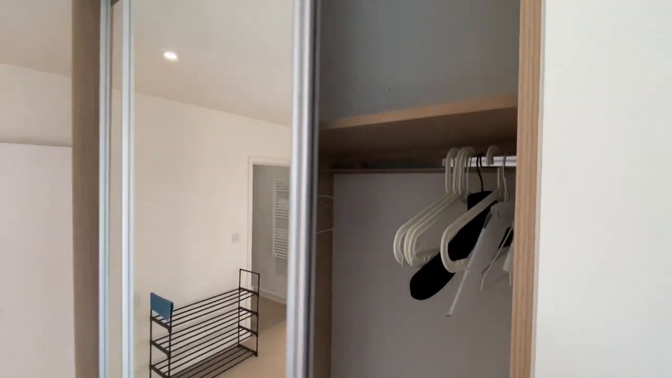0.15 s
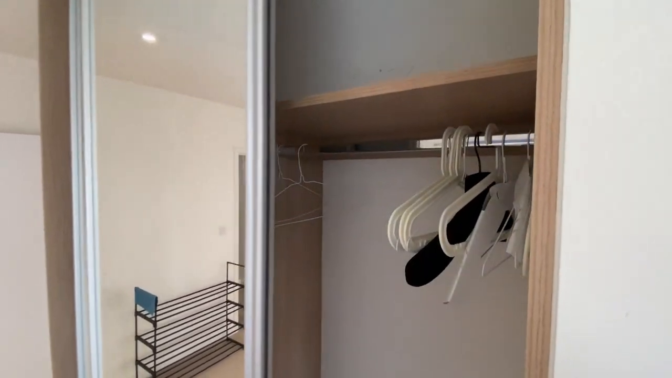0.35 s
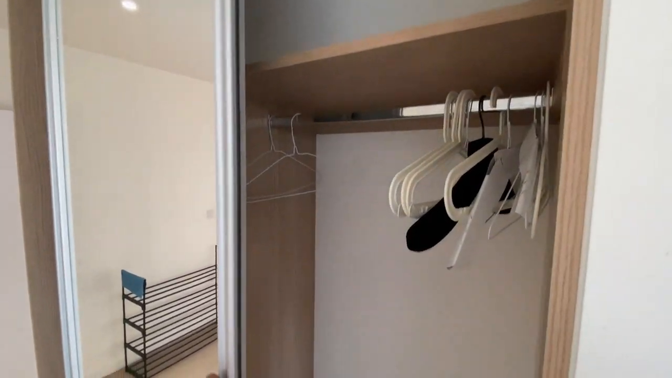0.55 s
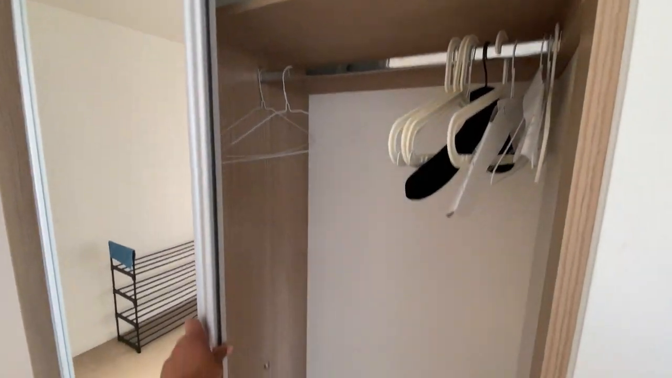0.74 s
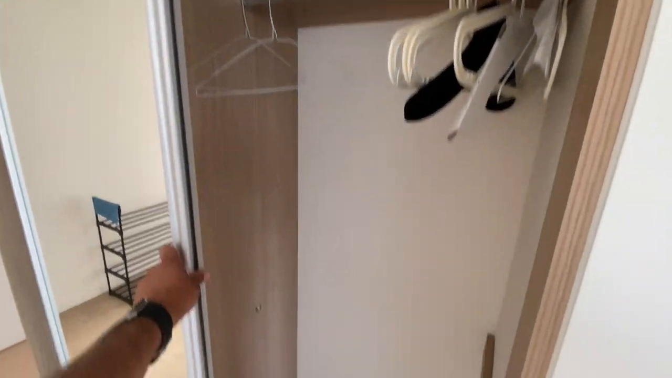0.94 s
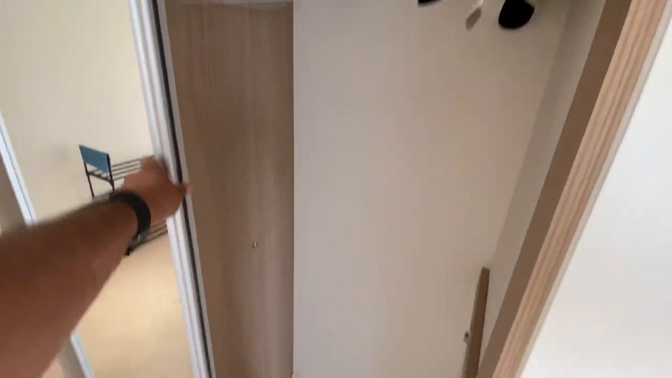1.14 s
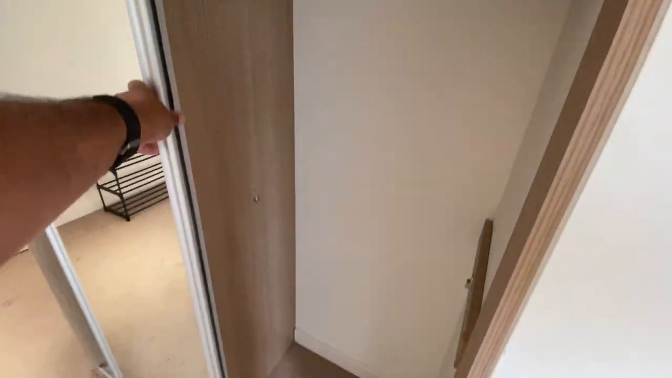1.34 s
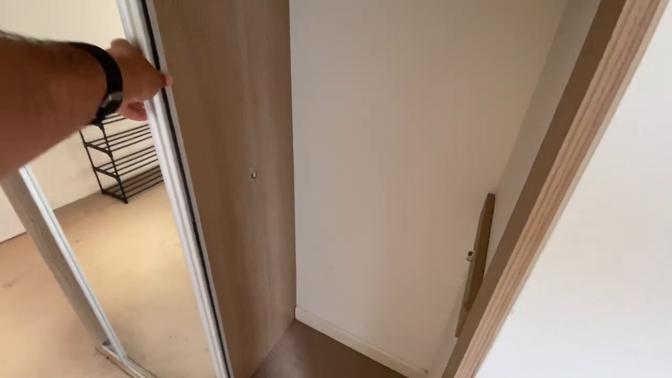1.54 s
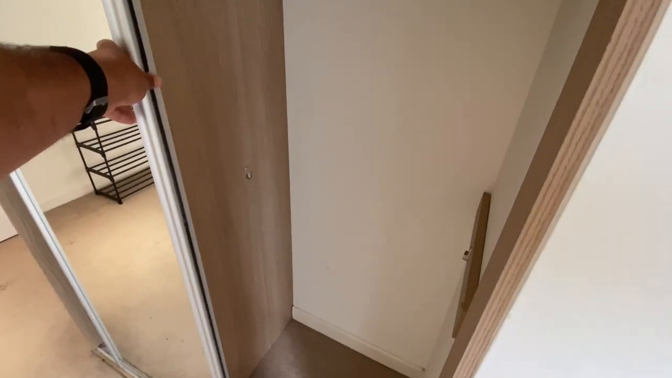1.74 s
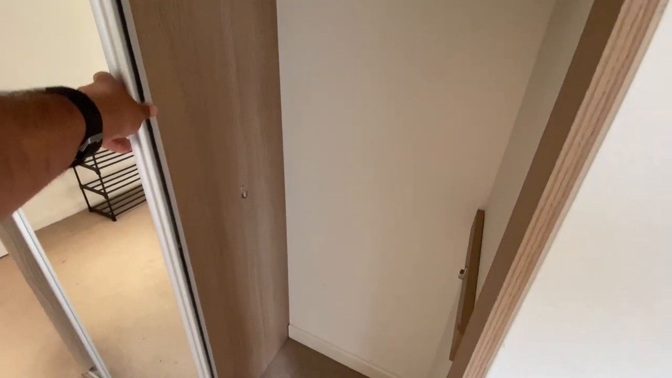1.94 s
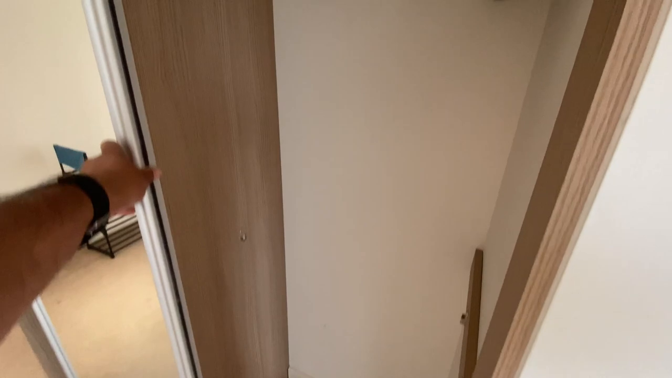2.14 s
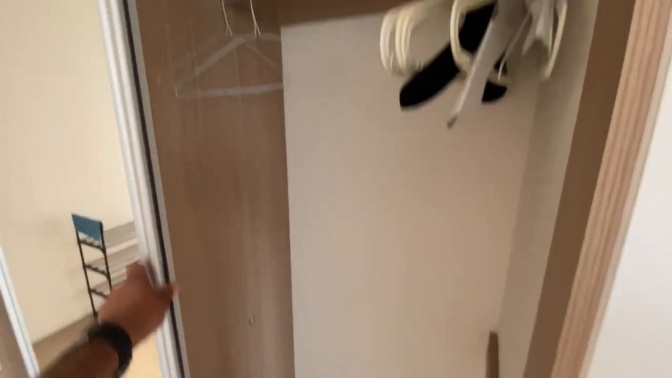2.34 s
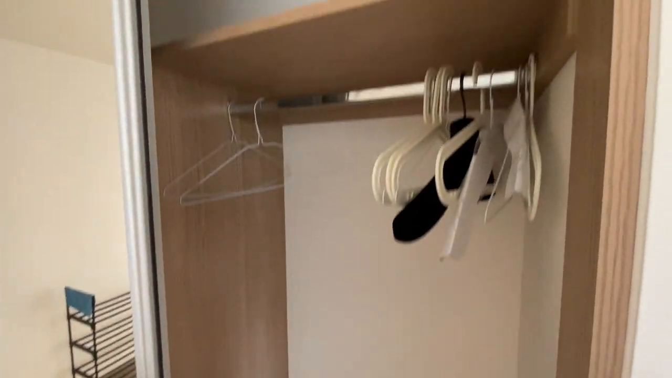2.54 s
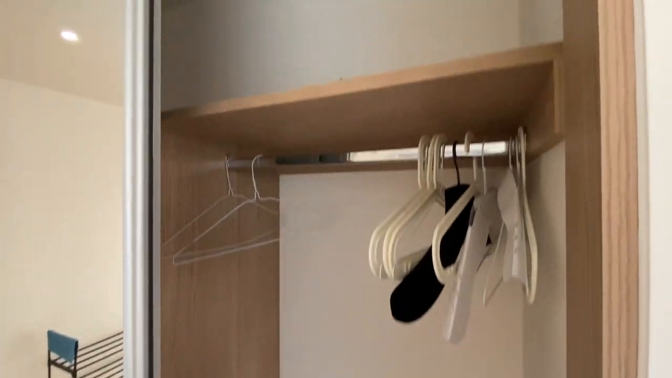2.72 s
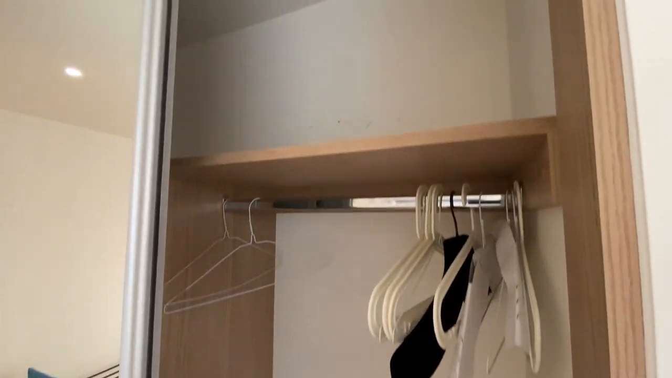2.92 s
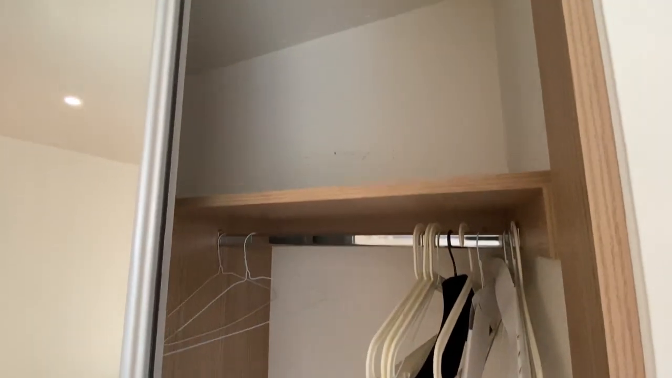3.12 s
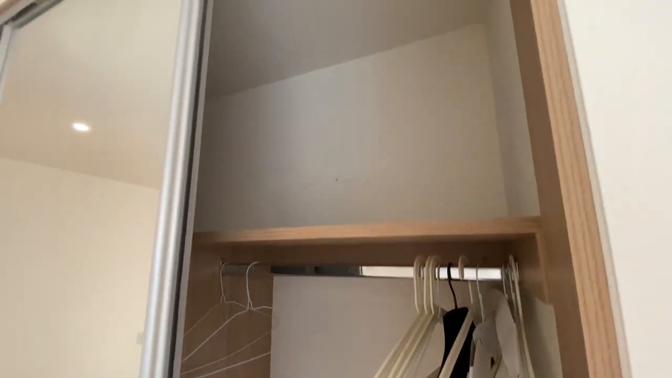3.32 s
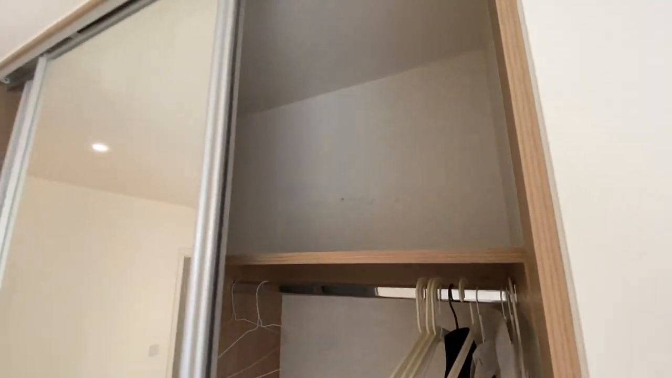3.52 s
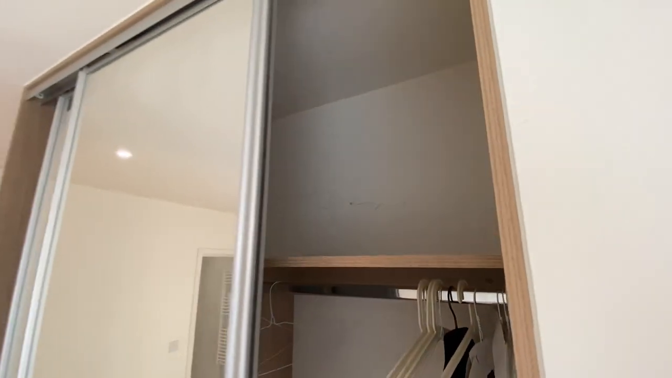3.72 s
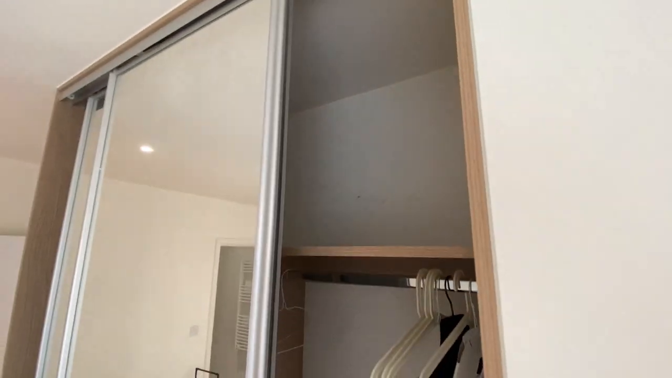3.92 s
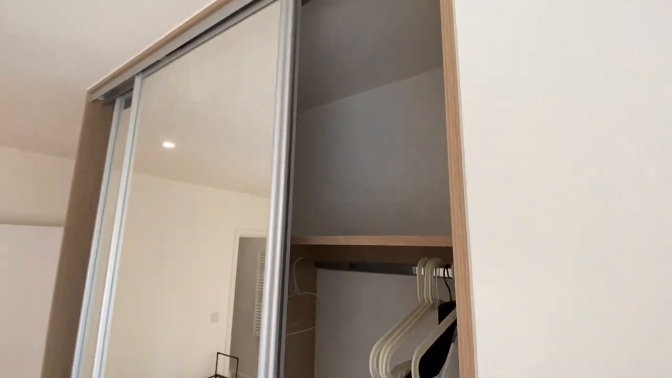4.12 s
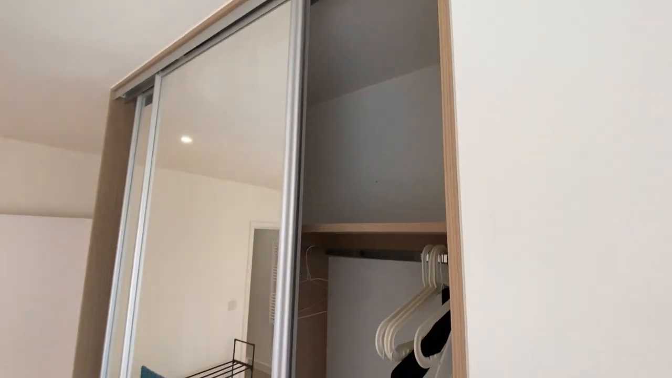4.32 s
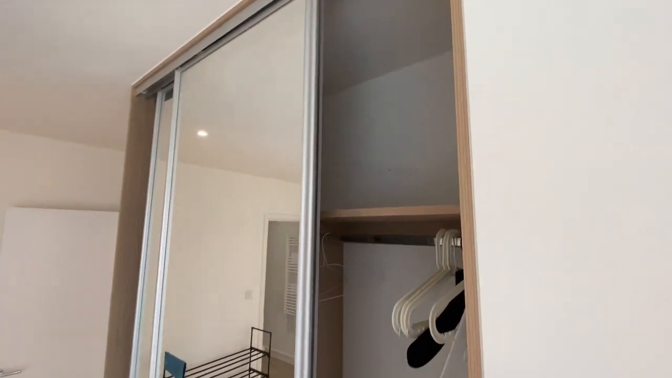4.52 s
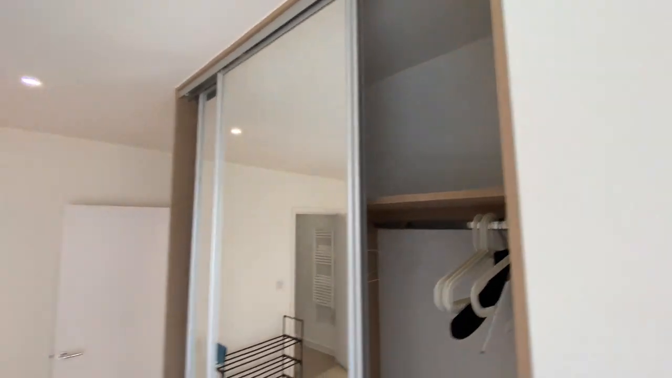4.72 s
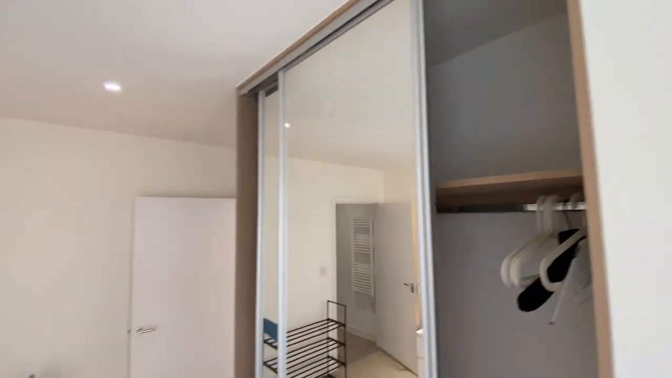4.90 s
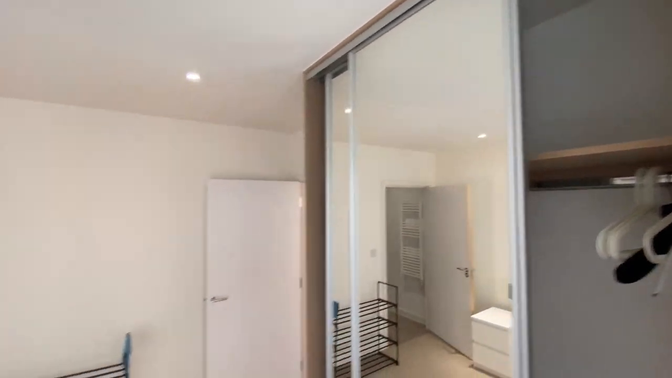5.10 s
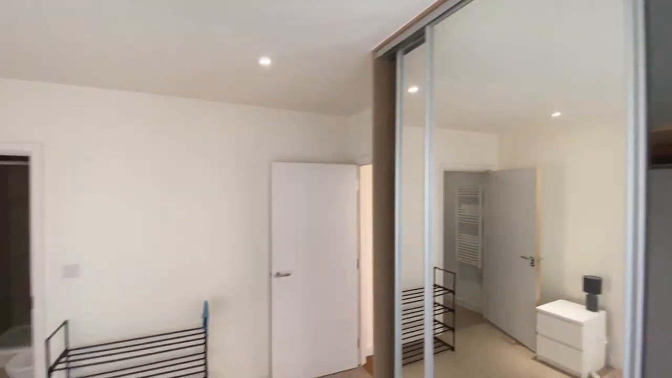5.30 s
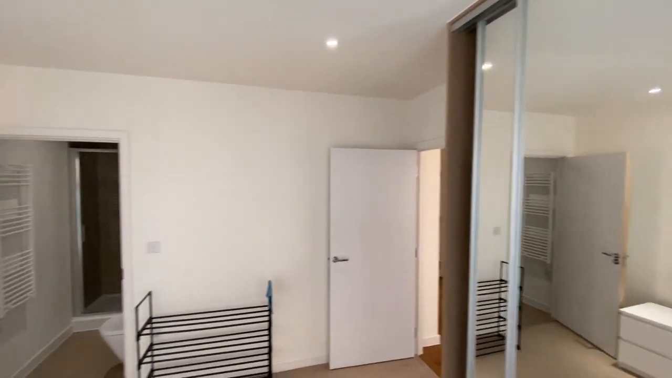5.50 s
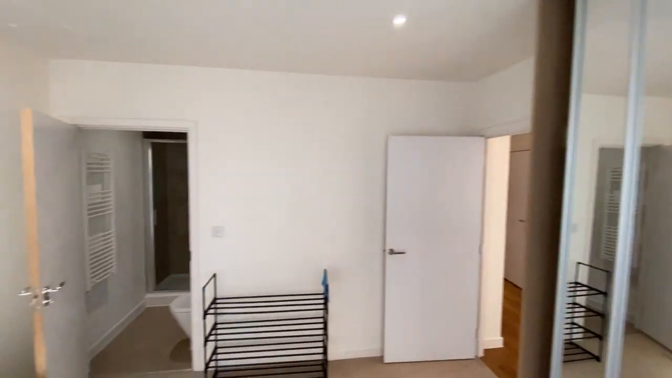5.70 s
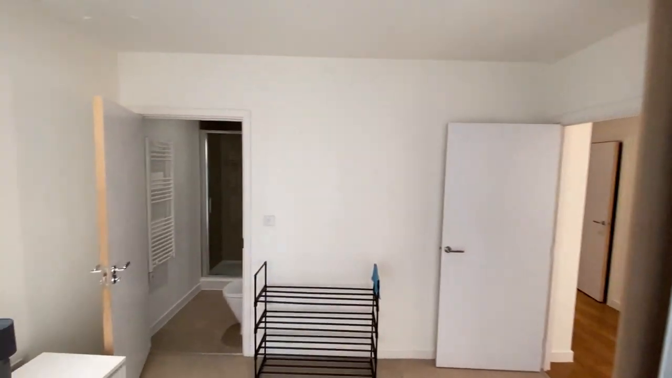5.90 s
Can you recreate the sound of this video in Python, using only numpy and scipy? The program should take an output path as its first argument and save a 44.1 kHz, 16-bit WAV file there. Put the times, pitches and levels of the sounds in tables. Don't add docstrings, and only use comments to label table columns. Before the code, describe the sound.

Close up in a quiet bedroom, a metal-framed wardrobe door is already rolling, with a low panel boom, woody drone, gritty hiss and dense bright clicks. It slows and nearly stops after about a second. Following a hush with faint creaks and ticks, it shifts again in a short rattling burst with knocks and a scrape, then a sharp clack. Soft foot scuffs and dull floor thuds finish, heard in stereo at arm's length.

```python
import sys
import numpy as np
from scipy import signal
from scipy.fft import rfft, irfft, next_fast_len
from scipy.io import wavfile
from scipy.ndimage import uniform_filter1d

SR = 44100
rng = np.random.default_rng(int(sys.argv[2]) if len(sys.argv) > 2 else 0)


def magnitude_from_level(level_db):
    exponent = np.asarray(level_db, float) / 20
    return 10 ** exponent


def wav_out(sig):
    wavfile.write(sys.argv[1], SR, np.round(np.clip(np.atleast_2d(sig).T, -1, 1) * 32767).astype(np.int16))


N = 266883

# frequency in Hz, width in Hz, level in dB.
CARCASS_MODES = [(227, 49, -0.5), (299, 21, -1.5), (413, 8.7, 10), (894, 75, -4), (1020, 11, -5.5),
                 (1590, 79, 0.5), (1993, 21, 8)]
# frequency in Hz, level in dB per Hz.
WOOD_SPECTRUM = [(180, -14.5), (300, -8), (635, -6.5), (928, -2.5), (1160, -3), (2150, -11.5), (2600, -13),
                 (3380, -83), (5720, -120)]


def evened(x):
    return x / np.sqrt(np.mean(x ** 2) + 1e-20)


def noise():
    return rng.standard_normal((2, N))


def columns(rows, x, warp=np.asarray):
    first, *rest = np.transpose(rows)
    return [np.interp(warp(x), warp(first), c) for c in rest]


def shaped(x, spectrum=None, modes=(), modes_db=0.):
    size = next_fast_len(N)
    hz = np.fft.rfftfreq(size, 1 / SR) + 1
    ring = sum(magnitude_from_level(db) / (1 + 2j * (hz - f) / width) for f, width, db in modes)
    if spectrum is None:
        low_cut = hz ** 4 / (hz ** 4 + 36.0 ** 4)
        gain = ring * low_cut
    else:
        inside = (hz > spectrum[0][0]) & (hz < spectrum[-1][0])
        smooth = magnitude_from_level(columns(spectrum, hz, np.log)[0]) * inside
        gain = smooth * (1 + magnitude_from_level(modes_db) * ring)
    return evened(irfft(rfft(x, size) * gain, size)[:, :N])


def lumpy(length):
    return evened(uniform_filter1d(uniform_filter1d(rng.standard_normal(N), length), length))


def grit(per_s, spread_db, lump_s, lump_db):
    lumps = lumpy(int(lump_s * SR))
    size = magnitude_from_level(spread_db * np.minimum(rng.exponential(1, N), 4) + lump_db * lumps)
    return size * (rng.random(N) < per_s / SR) * noise()


def during(rows, fade_s=0.028):
    t = np.arange(N) / SR
    start_s, end_s = rows[0][0], rows[-1][0]
    fade_in = np.clip((t - start_s) / fade_s + .5 + 9 * (start_s < .01), 0, 1)
    fade_out = np.clip((end_s - t) / fade_s + .5 + 9 * (end_s > 6), 0, 1)
    return fade_in * fade_out


def add(mix, s, sound):
    part = mix[..., round(s * SR):][..., :sound.shape[-1]]
    part += sound[..., :part.shape[-1]]


def strokes(rows, fall_db_per_s, sag_db_per_s=0):
    start, rise, hold, db = np.transpose(rows)[:, :, None]
    at = np.arange(0, N + 64, 64)
    t = at / SR - start
    swell = np.sin(np.pi / 2 * np.clip(t / rise, 0, 1)) ** 2
    fall_db = fall_db_per_s * np.maximum(t - rise - hold, 0) + sag_db_per_s * np.maximum(t, 0)
    gain = swell * magnitude_from_level(db - fall_db)
    return np.interp(np.arange(N), at, np.sqrt((gain ** 2).sum(0)))


def steady(x, evenness):
    swing = abs(signal.hilbert(x, next_fast_len(N))[:, :N])
    return evened(x / (swing + 0.071) ** np.clip(evenness, 0, 1))


def room_air():
    # frequency in Hz, level in dB per Hz.
    air_spectrum = [(15, -34), (25, -21), (81, 1), (145, -7.5), (289, -4.5), (546, -23.5), (761, -20.5),
                    (933, -22), (1060, -26.5), (1300, -25), (1950, -25.5), (2580, -37.5), (6810, -33.5),
                    (9240, -41), (11000, -46.5), (14400, -76), (22000, -120)]
    return magnitude_from_level(-69) * shaped(noise(), air_spectrum)


def panel(roll):
    # frequency in Hz, width in Hz, level in dB.
    boom_modes = [(60.8, 4.8, 11.5), (66, 4.1, -10.5)]
    # frequency in Hz, width in Hz, level in dB.
    flex_modes = [(99.4, 7, 4), (123.9, 6.2, 4.5), (177, 60, -26)]
    # start in seconds, hold in seconds, level in dB.
    sway_rows = [(-.05, 0.27, -45.5), (.29, 0.043, -41.5), (.46, 0.085, -39.5), (.62, 0.12, -44.5),
                 (.81, 0.005, -44.5), (.94, 0.14, -53.5), (1.69, 0.33, -63.5), (2.47, 0.14, -63.5),
                 (2.7, .015, -73), (3.29, 0.026, -56.5), (3.48, 0.24, -64.5), (3.84, 0.02, -51),
                 (4.3, 0.069, -63.5)]
    # start in seconds, hold in seconds, level in dB.
    flex_rows = [(-.05, 0.062, -45), (0.169, 0.016, -42.5), (0.374, 0.2, -42.5), (0.61, 0.18, -47),
                 (0.831, 0.023, -49), (0.918, 0.17, -47.5), (1.372, 0.18, -71.5), (2.225, 0.033, -68),
                 (2.422, 0.13, -66), (2.697, 0.01, -70), (2.802, 0.017, -65.5), (3.652, 0.15, -52),
                 (3.748, 0.12, -45.5), (4.18, 0.24, -64.5)]
    rise_s, fall_db_per_s = 0.035, 265
    sway = strokes([(s, rise_s, hold, db) for s, hold, db in sway_rows], fall_db_per_s)
    flex = strokes([(s, rise_s, hold, db) for s, hold, db in flex_rows], fall_db_per_s)
    boom = np.hypot(sway, roll) * steady(shaped(noise(), modes=boom_modes), 0.74)
    return boom + np.hypot(flex, magnitude_from_level(1.5) * roll) * steady(shaped(noise(), modes=flex_modes), 0.53)


def track(roll):
    # frequency in Hz, width in Hz, level in dB.
    rail_modes = [(3150, 17, -1), (3774, 40, -2.5), (4170, 93, -2), (4690, 90, -2.5), (5490, 14, 5.5),
                  (5840, 33, 5.5), (6240, 31, 9.5), (6700, 13, -2), (6794, 9.7, 13), (6770, 9.7, -3),
                  (8780, 46, 10.5), (9240, 45, -1)]
    # frequency in Hz, level in dB per Hz.
    hiss_spectrum = [(1180, 4.5), (2000, 2), (2510, 4.5), (3400, 7.5), (4180, 2), (5560, -8.5), (6800, -23),
                     (7600, -64)]
    # frequency in Hz, level in dB per Hz.
    fizz_spectrum = [(4500, -5), (5600, -2.5), (6700, -5.5), (7400, -9), (8730, -8), (10100, -9),
                     (11200, -17), (12200, -29), (12900, -27), (13400, -25), (14800, -23), (15500, -28)]
    # start, rise and hold in seconds, hiss level in dB, fizz re hiss in dB.
    scrape_rows = [(-.03, .02, 0.066, -44.5, 2), (0.14, 0.046, 0.077, -50.5, -1),
                   (.22, 0.053, 0.083, -49.5, -1.5), (.674, 0.0048, .05, -73, -8),
                   (1.26, .006, .015, -67.5, -20), (2.434, 0.066, 0.081, -75.5, -25),
                   (2.592, .1, .06, -77.5, -3.5), (3.26, 0.11, 0.11, -73.5, -6),
                   (3.553, 0.081, 0.16, -65.5, -0.5), (3.751, 0.1, 0.052, -52.5, 2.5),
                   (4.112, 0.006, 0.13, -60, -2), (4.2925, 0.004, 0.067, -58.5, -8),
                   (2.963, .004, .02, -69, -14)]
    hiss = strokes([row[:-1] for row in scrape_rows], 194)
    fizz_rows = [(s, rise, hold, db + re_db) for s, rise, hold, db, re_db in scrape_rows]
    fizz = strokes(fizz_rows, fall_db_per_s=215, sag_db_per_s=14)
    wear = magnitude_from_level(-60) * (roll / magnitude_from_level(-60)) ** 1.22
    specks = grit(15000, .6, .008, 1.1)
    out = np.hypot(hiss, magnitude_from_level(-4.5) * wear) * shaped(specks, hiss_spectrum, rail_modes, modes_db=5.0)
    out += fizz * shaped(specks, fizz_spectrum, rail_modes, modes_db=-8.0)
    dull = [row for row in fizz_spectrum if row[0] < 12500]
    return out + magnitude_from_level(-15) * wear * shaped(specks[:, ::-1], dull, rail_modes, modes_db=0.0)


def rolling():
    # time in seconds, carcass drone level in dB.
    roll_rows = [(0.0, -57), (0.11, -55.5), (0.27, -51), (0.66, -58), (0.84, -60), (0.91, -64), (0.98, -60),
                 (1.16, -61), (1.25, -68.5), (1.56, -78), (2.1, -92), (2.45, -76), (2.97, -66), (3.28, -71),
                 (3.47, -67.5), (3.9, -57.5), (4.05, -65.5), (4.62, -72.5)]
    # frequency in Hz, level in dB per Hz.
    drone_spectrum = [(100, -53), (170, 9.5), (424, -5), (532, -3.5), (1010, -0.5), (1360, -9), (1560, -7),
                      (2600, -6.5), (3380, -25), (5720, -120)]
    roll = magnitude_from_level(columns(roll_rows, np.arange(N) / SR)[0])
    drone = roll * shaped(grit(5000, 1.5, .02, 1.8), drone_spectrum, CARCASS_MODES, modes_db=-2.5)
    return (panel(roll) + drone + track(roll)) * during(roll_rows)


def frame_rings():
    # start in seconds, length in seconds, frequency in Hz, width in Hz, level in dB.
    ring_rows = [(0, .08, 3250, 1100, -51), (0, .03, 5500, 200, -57), (.03, .018, 3200, 120, -51),
                 (.03, .04, 5490, 60, -52), (0, .08, 8800, 2500, -58), (.25, .11, 5500, 90, -61),
                 (.32, .02, 4900, 300, -57), (.522, .025, 13800, 2200, -75), (2.52, .44, 13100, 1000, -99),
                 (2.81, .04, 1950, 150, -71), (2.9, .05, 2000, 120, -74), (2.92, .1, 5550, 80, -82),
                 (3.05, .45, 13100, 1000, -99), (3.12, .22, 5500, 1800, -80), (3.27, .06, 5380, 200, -82),
                 (3.37, .05, 1000, 300, -70), (3.39, .04, 2000, 500, -72), (3.43, .11, 4150, 90, -78),
                 (3.44, .07, 1700, 40, -71), (3.595, .03, 4000, 2500, -66), (4.112, .012, 13500, 1800, -66),
                 (4.148, .03, 4700, 250, -61), (4.148, .05, 2800, 700, -61), (4.2, .02, 3300, 500, -64),
                 (4.292, .006, 4200, 1500, -55), (4.296, .01, 2700, 1200, -57), (4.31, .11, 2000, 900, -63),
                 (4.32, .014, 3500, 900, -60), (4.49, .14, 900, 120, -76), (4.735, .07, 950, 200, -64),
                 (4.76, .08, 2050, 300, -68), (5.1, .13, 1650, 150, -78), (5.1, .1, 1100, 200, -78),
                 (5.398, .05, 900, 400, -75), (5.81, .015, 900, 600, -73), (5.88, .04, 1050, 250, -72)]
    out = np.zeros((2, N))
    for s, length_s, hz, width_hz, db in ring_rows:
        t = np.arange(0, length_s + .004, 1 / SR)
        rub = rng.standard_normal((2, len(t) + 1000))
        rub = signal.lfilter(*signal.butter(2, width_hz / SR), rub)[:, 1000:]
        swell = np.sin(np.pi * (t / t[-1]) ** 0.7)
        add(out, s, magnitude_from_level(db) * swell * evened(rub * np.sin(2 * np.pi * hz * t)))
    return out


def rail_ping(t, hz, snap):
    overtone, detune, phase = rng.random(3)
    lag_cycles = np.array([[0], [.25]])
    ping = np.sin(2 * np.pi * (hz * t - lag_cycles)) * ((t / .00055) * np.exp(1 - t / .00055)) ** 2
    overtone_hz = (1.25 + .3 * overtone) * hz
    ping = ping + .1 * np.sin(2 * np.pi * overtone_hz * t) * (t / .0007) * np.exp(1 - t / .0007)
    tail = np.sin(2 * np.pi * ((.9 + .17 * detune) * hz * t + phase - lag_cycles))
    ping = ping + 0.7 * tail * (1 - np.exp(-t / 0.002)) * np.exp(-t / 0.0036)
    return ping + magnitude_from_level(-17) * snap * (t / .0006) * np.exp(1 - t / .0006)


def carcass_knock(t, wood):
    # frequency in Hz, level in dB, 60 dB decay in seconds.
    knock_modes = [(881, -3.5, 0.059), (1056, -5.5, 0.14), (1420, -39, 0.018), (1776, 8, 0.032),
                   (2175, 2.5, 0.046), (434.5, -7.5, 0.064)]
    knock = 0.66 * wood * magnitude_from_level(-60 * t / 0.16)
    for hz, db, t60_s in knock_modes:
        phase, detune = rng.random((2, 1)), rng.random()
        tone = np.sin(2 * np.pi * (hz * (.95 + 0.082 * detune) * t + phase))
        knock = knock + magnitude_from_level(db - 60 * t / t60_s - 37.0 * phase[0, 0]) * tone
    swell = 1 - np.exp(-(t / 0.0047) ** 2)
    return 0.71 * swell * knock


def clicks():
    # time in seconds, peak in dB, ping in Hz.
    joint_rows = [(0.146, -30, 4270), (0.4185, -37, 3830), (0.5225, -30.5, 3800), (0.6039, -37.5, 3960),
                  (0.6777, -33.5, 3870), (0.7305, -40, 3890), (0.7567, -41, 3930), (0.8302, -39.5, 3570),
                  (0.9032, -33.5, 3720), (1.001, -34, 3430), (1.094, -39, 3500), (1.2592, -49, 3530),
                  (1.277, -51, 3150), (2.2476, -63, 3400), (2.4722, -57.5, 2820), (2.815, -48, 3620),
                  (2.962, -47, 3600), (3.0272, -50.5, 3600), (3.0952, -49, 3640), (3.1344, -55.5, 3550),
                  (4.543, -66, 4200), (4.571, -64, 3440), (5.0663, -63, 3120), (5.4013, -75, 3320)]
    # time in seconds, peak in dB, ping in Hz.
    rattle_rows = [(0.1979, -35.5, 3800), (0.208, -34.5, 3250), (0.234, -32.5, 4350), (0.2478, -45, 3280),
                   (0.266, -54, 3830), (0.329, -55, 4800), (0.383, -39, 4170), (0.4281, -34.5, 4010),
                   (0.4622, -33.5, 3900), (0.476, -37.5, 3840), (0.5077, -45, 3800), (0.535, -38, 3530),
                   (0.688, -38.5, 3670), (0.784, -52, 3780), (0.562, -42, 3840), (0.582, -45, 4100),
                   (0.6372, -42, 3870), (0.846, -51, 3940), (0.963, -44.5, 3410), (1.022, -43, 3620),
                   (1.0597, -43, 3600), (2.761, -65, 3180), (2.9284, -54, 3730), (0.2866, -39, 4340)]
    # time in seconds, peak in dB, ping in Hz, knock and crack re ping in dB.
    bump_rows = [(0.182, -31, 4130, -6.5, -5), (3.6115, -54, 3500, -7, 0), (3.6545, -35, 4180, -2, -1.5),
                 (3.7607, -41.5, 3990, -3, -1.5), (3.7698, -37, 3840, -1, -2), (3.817, -39, 3900, -0.5, -3),
                 (4.072, -55, 3830, -3.5, -4), (4.1125, -35, 4200, -16, 1),
                 (4.1182, -30.5, 4380, -12.5, -2.5), (4.2938, -43, 3900, -5, -11),
                 (4.2986, -43.5, 2390, -8.5, -16), (4.3228, -50.5, 3900, 0, -15), (4.36, -59, 3800, 8, -7)]
    # frequency in Hz, level in dB per Hz.
    crack_spectrum = [(900, -42), (2000, -11.5), (3000, 1.5), (4200, -2.5), (6500, -8), (7400, -13.5),
                      (10000, -14), (11300, -30), (12500, -54)]
    snap_spectrum = [(4000, -1), (5200, -12), (6500, -19.0), (10500, -11), (11300, -25), (11900, -40)]
    joints = [(s, db, hz, -2.5 - 0.16 * (db + 41.5), -8) for s, db, hz in joint_rows]
    rattles = [(s, db, hz, -6, -6.5) for s, db, hz in rattle_rows]
    pings, blows, t = np.zeros((2, N)), np.zeros((2, N)), np.arange(6000) / SR
    rail = shaped(noise(), crack_spectrum)
    bright = shaped(rail, snap_spectrum)
    wood = shaped(noise(), WOOD_SPECTRUM, CARCASS_MODES, modes_db=-9.5)
    crack_gain = (1 - np.exp(-(t / 0.0032) ** 2)) * (magnitude_from_level(-60 * t / 0.03) + magnitude_from_level(-20.5 - 60 * t / 0.13))
    for s, db, hz, knock_db, crack_db in [*joints, *bump_rows, *rattles]:
        start = int(rng.random() * (N - len(t)))
        piece = slice(start, start + len(t))
        crack = rail[:, piece] * crack_gain
        knock = carcass_knock(t, wood[:, piece])
        add(pings, s + 0.001023, magnitude_from_level(db) * rail_ping(t, hz, bright[:, piece]))
        add(blows, s + .0001, magnitude_from_level(db) * (magnitude_from_level(crack_db) * crack + magnitude_from_level(knock_db) * knock))
    for late_s, db in [(.0042, -9), (.0115, -35)]:
        add(blows, late_s, magnitude_from_level(db) * pings[::-1])
    dull = signal.butter(8, 2 * 11300 / SR, output="sos")
    return signal.sosfilt(dull, pings), blows


def ticks():
    # time in seconds, peak in dB, frequency in Hz.
    tick_rows = [(1.244, -53.5, 570), (1.42, -55.5, 473), (1.48, -68, 515), (1.526, -62.5, 525),
                 (4.495, -55, 486), (4.495, -59, 303), (4.636, -54.5, 567), (4.636, -55.5, 344),
                 (5.066, -65, 1065), (5.068, -58, 2010), (5.091, -64, 1070), (5.092, -60, 1990),
                 (5.2, -64, 1040), (5.4, -66, 1290), (5.673, -55.5, 495), (6.014, -53, 540)]
    out, t = np.zeros((2, N)), np.arange(3000) / SR
    for s, db, hz in tick_rows:
        gain = magnitude_from_level(db - 60 * t / 0.029) * (1 - np.exp(-t / 0.0018))
        add(out, s, gain * np.sin(2 * np.pi * hz * t) * np.ones((2, 1)))
    return out


def moan(width_hz, rows):
    hz, db = columns(rows, np.arange(N) / SR)
    rub = signal.lfilter(*signal.butter(2, width_hz / SR), noise())
    return magnitude_from_level(db) * evened(rub * np.sin(2 * np.pi * np.cumsum(hz) / SR)) * during(rows)


def creeping():
    # width in Hz, then rows of time in seconds, frequency in Hz, level in dB.
    creep_tables = [
        (110, [(1.48, 1860, -84), (1.54, 1860, -84), (1.62, 1840, -87), (1.7, 1915, -80.5), (1.86, 1960, -79.5), (1.93, 1980, -88), (2.03, 1990, -94.5), (2.09, 1980, -84), (2.13, 1980, -92)]),
        (109.6, [(1.48, 950, -85), (1.8, 865, -86), (2.08, 860, -82)]),
        (1500, [(3.37, 1050, -66), (3.41, 1500, -62.5), (3.54, 1680, -70)]),
        (250, [(3.6, 1400, -75), (3.625, 1444, -57.5), (3.65, 1430, -65)]),
        (70, [(2.93, 5600, -86), (2.965, 5580, -85), (3.015, 5550, -84)]),
        (150, [(3.34, 6350, -90), (3.4, 6340, -87), (3.58, 6320, -83)]),
        (90, [(2.6, 5940, -90), (2.68, 5880, -92), (2.76, 5800, -97)]),
        (200, [(2.62, 10500, -99), (2.9, 10600, -97), (3.1, 10600, -99), (3.4, 10400, -100), (3.5, 10500, -99)]),
        (250, [(3.82, 6400, -71), (3.86, 6310, -55), (3.93, 6550, -66)]),
    ]
    return sum(moan(*drag) for drag in creep_tables)


def squeal(rows):
    hz, db = columns(rows, np.arange(N) / SR)
    waver = 1 + 0.0011 * evened(uniform_filter1d(rng.standard_normal(N), 150))
    broken_db = 3 * lumpy(400) - 3
    return magnitude_from_level(db + broken_db) * np.sin(2 * np.pi * np.cumsum(hz * waver) / SR) * during(rows)


def axle():
    # time in seconds, frequency in Hz, level in dB.
    squeal_tables = [
        [(2.245, 10500, -99), (2.27, 10600, -95), (2.31, 11000, -97), (2.345, 11300, -93), (2.41, 10950, -103),
         (2.46, 10550, -91), (2.5, 9700, -89), (2.51, 9600, -95)],
        [(3.43, 1690, -74), (3.45, 1700, -67), (3.495, 1710, -67), (3.53, 1710, -78)],
    ]
    return sum(squeal(rows) for rows in squeal_tables)


def scuffing():
    # frequency in Hz, level in dB per Hz.
    rustle_spectrum = [(1290, -2.5), (2200, -4.5), (3040, -8), (3880, -10), (6140, -13), (7170, -22),
                       (10100, -23), (11000, -30), (14400, -65), (22000, -120)]
    # frequency in Hz, level in dB per Hz.
    thud_spectrum = [(15, -61), (25, -13), (97, 5), (129, -14.5), (194, -1.5), (227, -9), (300, -12.5),
                     (390, -19), (660, -120)]
    # start, rise and hold in seconds, body level in dB, rustle re body in dB.
    step_rows = [
        (4.592, 0.044, 0.073, -73.5, -6.5),
        (4.7, 0.066, 0.011, -56, -1),
        (4.938, 0.043, 0.094, -78.5, -1),
        (5.045, 0.042, 0.15, -71.5, 0.5),
        (5.386, 0.0068, 0.051, -76.5, -4.5),
        (5.49, 0.04, 0.3, -79.5, -3.5),
        (5.761, 0.092, 0.057, -69, 0),
        (5.932, .03, .1, -71, -5.5),
    ]
    # start in seconds, hold in seconds, level in dB.
    thud_rows = [
        (4.612, 0.012, -60.5),
        (4.76, 0.15, -67),
        (4.927, 0.38, -68),
        (5.194, 0.24, -66),
        (5.524, 0.1, -70),
        (5.834, 0.038, -69.5),
    ]
    rub = grit(8000, 1.3, .008, .7)
    body = strokes([row[:-1] for row in step_rows], fall_db_per_s=118, sag_db_per_s=2)
    top_rows = [(s, 1.06 * rise, hold, db + re_db) for s, rise, hold, db, re_db in step_rows]
    top = strokes(top_rows, fall_db_per_s=113, sag_db_per_s=2)
    weight = strokes([(s, 0.024, hold, db) for s, hold, db in thud_rows], fall_db_per_s=148)
    out = body * shaped(rub, WOOD_SPECTRUM, CARCASS_MODES, modes_db=-7.0)
    out += top * shaped(rub[:, ::-1], rustle_spectrum)
    return out + weight * steady(shaped(noise(), thud_spectrum), 0.74)


def room(x):
    # frequency in Hz, 60 dB decay in seconds.
    decay_rows = [(100, 0.94), (500, 0.4), (2000, 0.22), (5000, 0.25), (11000, 0.29)]
    taps = np.zeros((2, SR // 2))
    at = np.arange(200, SR // 2 - 20, 20) + rng.integers(0, 20, (2, (SR // 2 - 201) // 20))
    np.put_along_axis(taps, at, rng.choice([-1., 1.], at.shape), 1)
    hz, t, z = signal.stft(taps, SR, nperseg=256)
    t60_s = columns(decay_rows, hz + 1, np.log)[0][:, None]
    tail = signal.istft(z * magnitude_from_level(-60 * t / t60_s), SR, nperseg=256)[1]
    return signal.fftconvolve(x, tail / np.linalg.norm(tail[0]), axes=1)[:, :N]


def scene():
    pings, blows = clicks()
    boards = ticks()
    echoes = room(magnitude_from_level(-0.5) * blows + magnitude_from_level(-14) * pings + magnitude_from_level(-7) * boards)
    door = rolling() + frame_rings() + pings + blows + creeping() + axle()
    return room_air() + door + magnitude_from_level(4.5) * boards + scuffing() + echoes


def low_pass(x):
    return signal.sosfilt(signal.butter(12, 15200, fs=SR, output="sos"), x)


def record(dry):
    # frequency in Hz, likeness 0-1, right port lead in radians, left re right in dB.
    port_rows = [(45, 1, 0.53, -5.5), (122, 0.82, 1.3, -7), (202, 0.74, 1.04, -10.5), (307, 0.52, 2, -5.5),
                 (453, 0.44, 3, -4.5), (590, 1, 4, 0), (950, 0.76, 5, -0.5), (1440, 0.45, 4, -1.5),
                 (1800, 0.49, 4, -3.5), (2090, 0, 4.5, -3.5), (2600, 0.5, 3.9, 1), (3100, 0.2, 3, 4.5),
                 (3700, 0.4, 1.4, 4), (4300, 0.55, 0.3, 0), (5000, 0.2, 1, 4), (5500, 0.65, 0.1, 2),
                 (6300, 0.65, 0, 1.5), (6900, 0.35, -1, 1.8), (7600, 0.45, -3.8, 3), (8300, 0.5, -3.8, 1),
                 (8800, 0.55, -6.2, -6), (9260, 0.6, -7.9, -9), (9800, 0.75, -6.7, -2),
                 (10500, 0.55, -5.5, -1), (11300, 0.7, -4, 0), (11700, 0.9, -3.3, 0), (12600, 0.5, -4.7, 0)]
    # frequency in Hz, gain in dB.
    notch_rows = [(11350, 0), (11850, -22), (12500, -22), (12800, 0)]
    size = next_fast_len(N + SR // 2)
    hz = np.fft.rfftfreq(size, 1 / SR)
    same, lead, tilt_db = columns(port_rows, hz + 1, np.log)
    same = np.clip(same, 0, 1)
    left, other = rfft(np.pad(dry, ((0, 0), (0, size - N)), "reflect"))
    right = np.exp(1j * lead) * (same * left + np.sqrt(1 - same ** 2) * other)
    pair = np.array([magnitude_from_level(tilt_db / 2) * left, magnitude_from_level(-tilt_db / 2) * right])
    centre = (magnitude_from_level(tilt_db) + magnitude_from_level(-tilt_db) + 2 * same * np.cos(lead)) / 4
    notch = magnitude_from_level(columns(notch_rows, hz)[0])
    mix = irfft(pair * notch / np.sqrt(centre + 0.063), size)[:, :N]
    return low_pass(mix)


dry = scene()
out = record(dry)
wav_out(out)
```